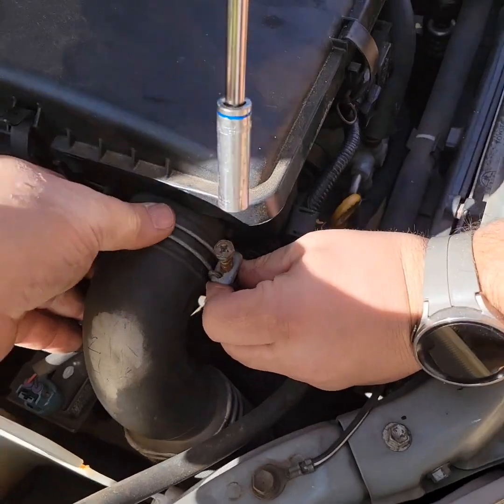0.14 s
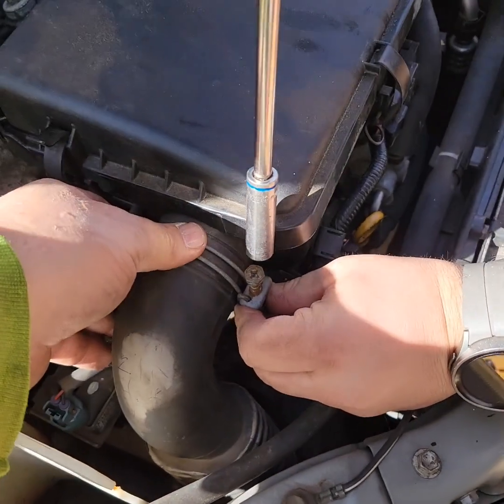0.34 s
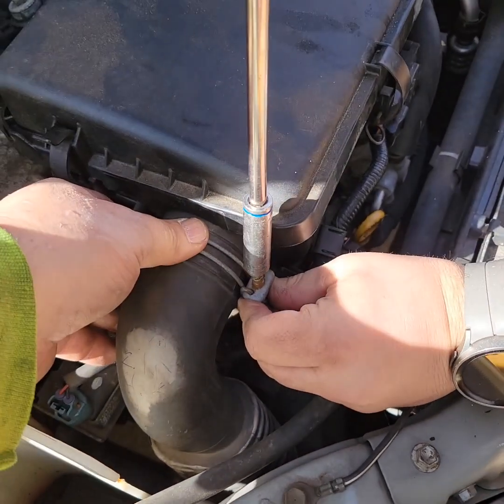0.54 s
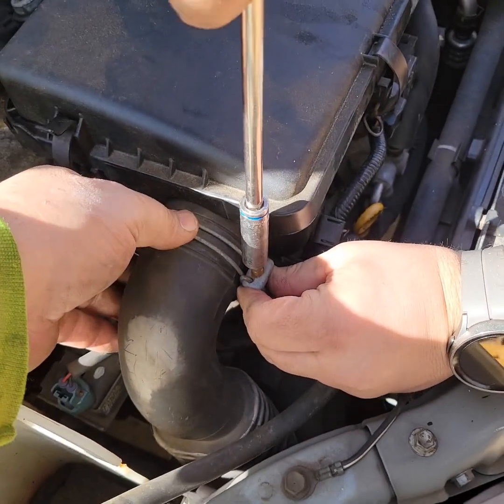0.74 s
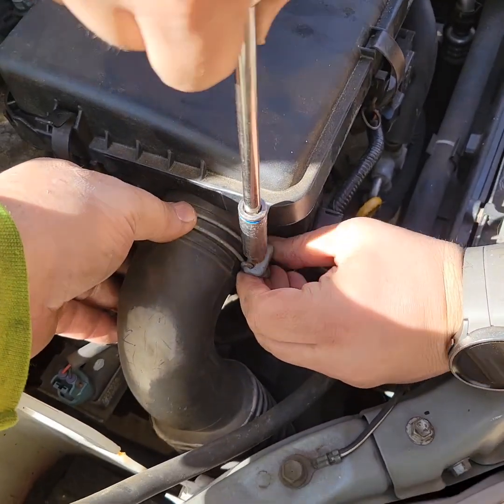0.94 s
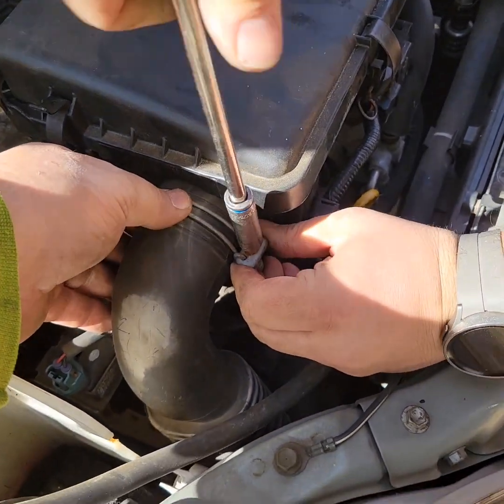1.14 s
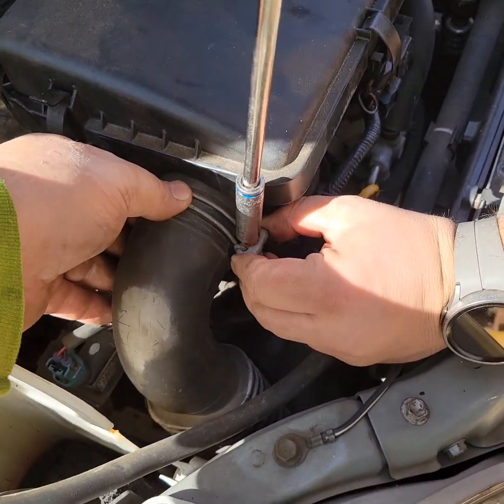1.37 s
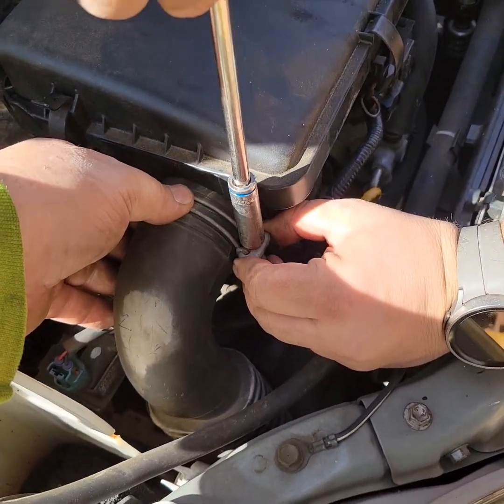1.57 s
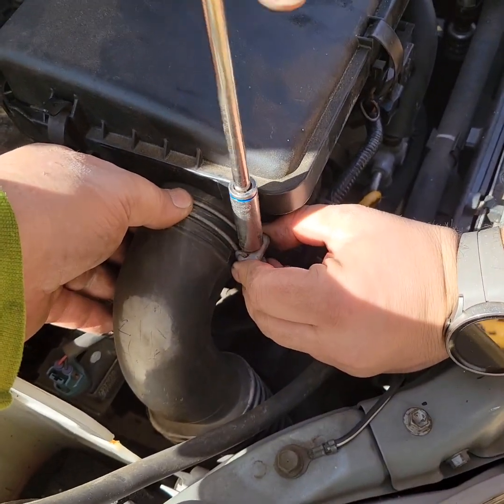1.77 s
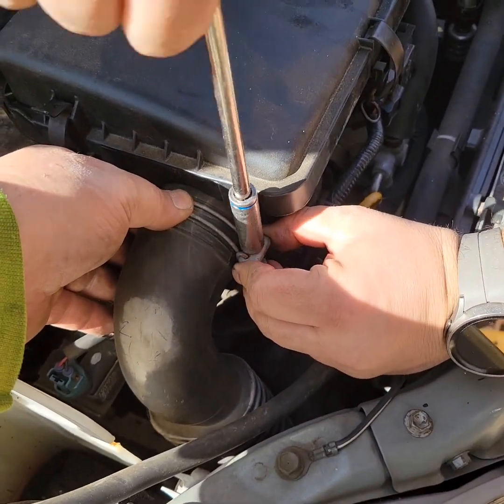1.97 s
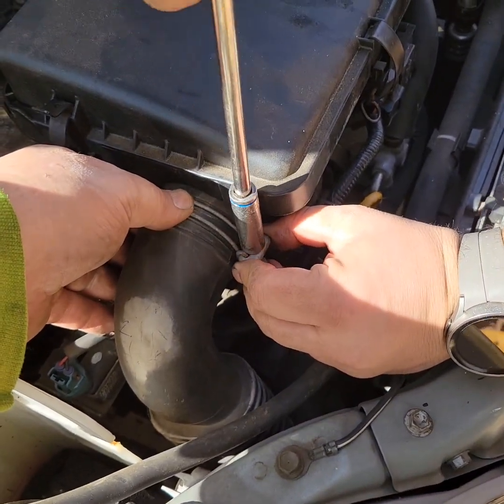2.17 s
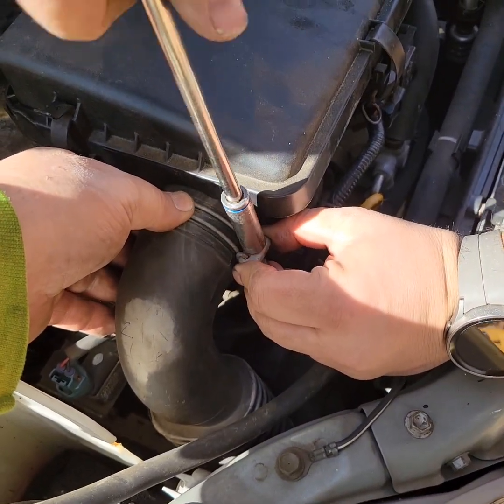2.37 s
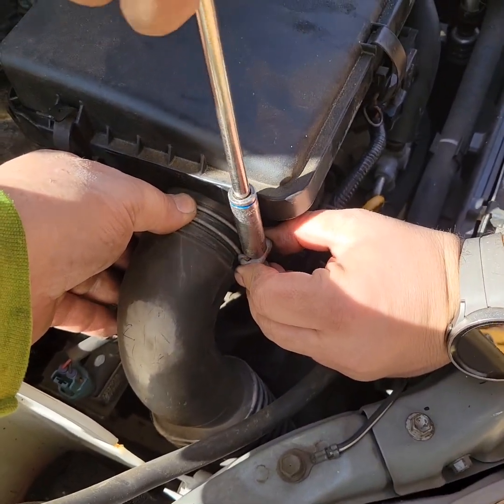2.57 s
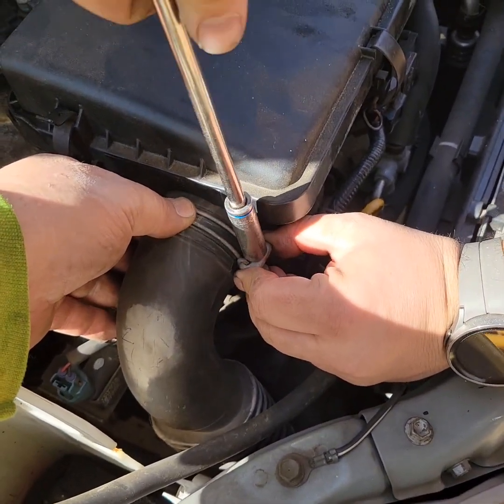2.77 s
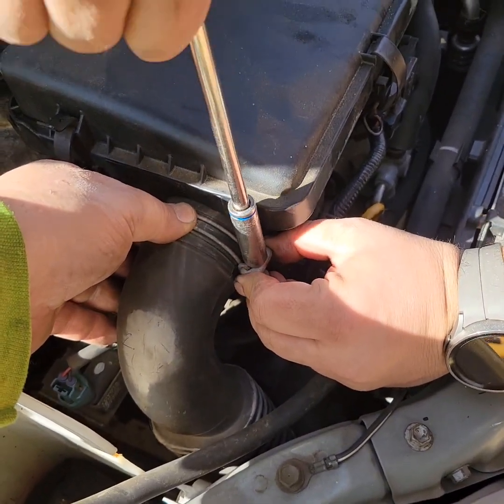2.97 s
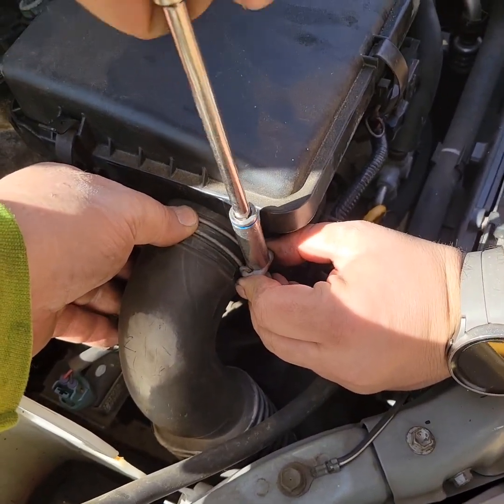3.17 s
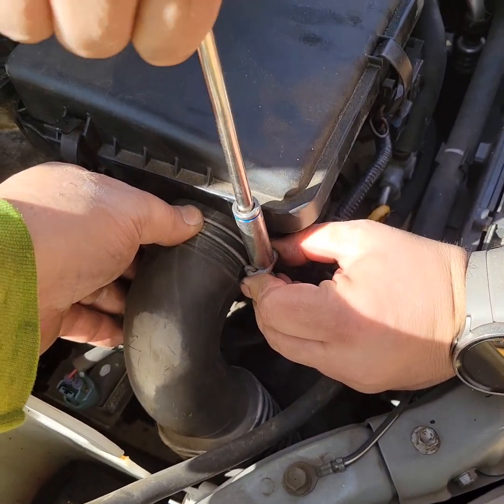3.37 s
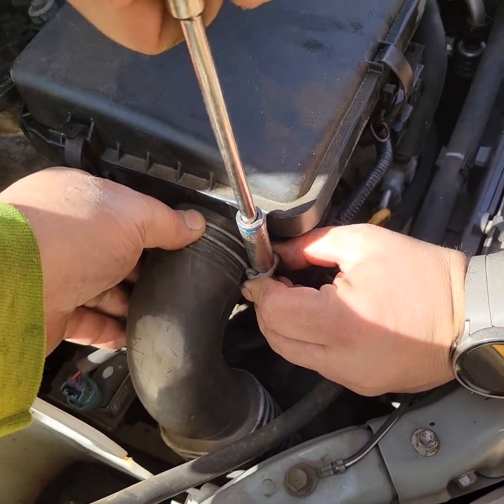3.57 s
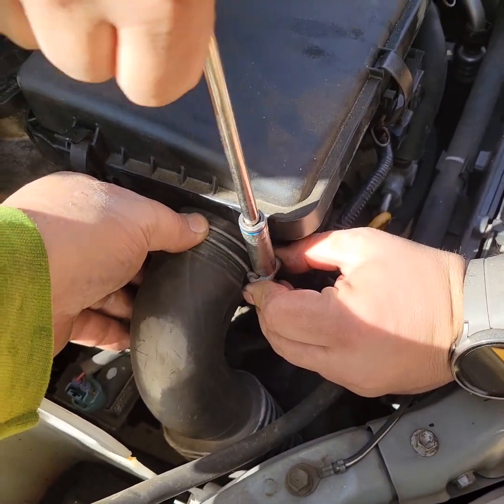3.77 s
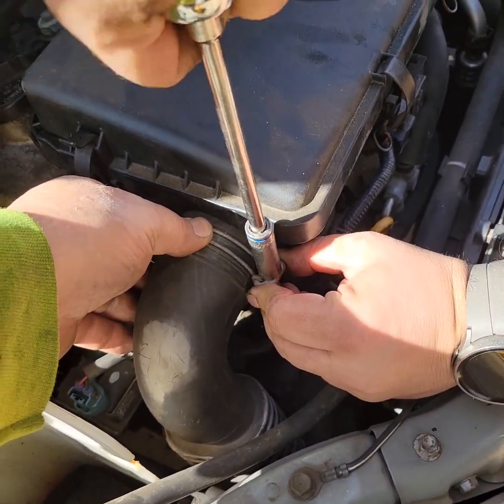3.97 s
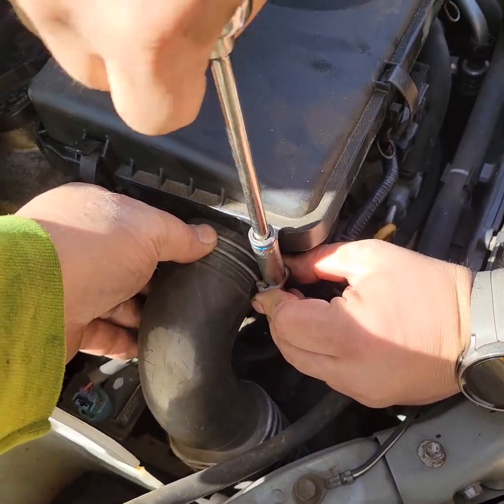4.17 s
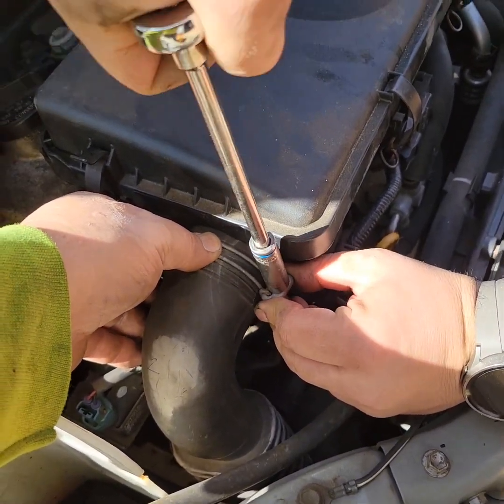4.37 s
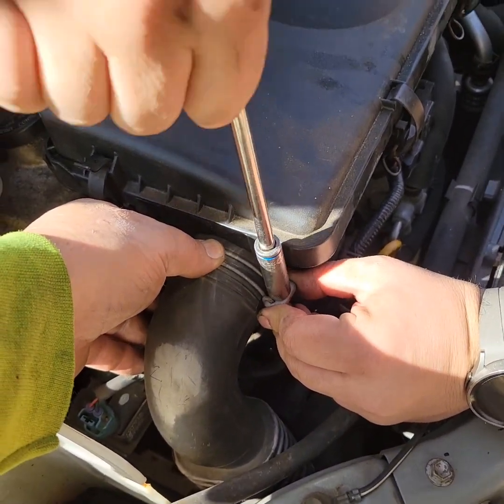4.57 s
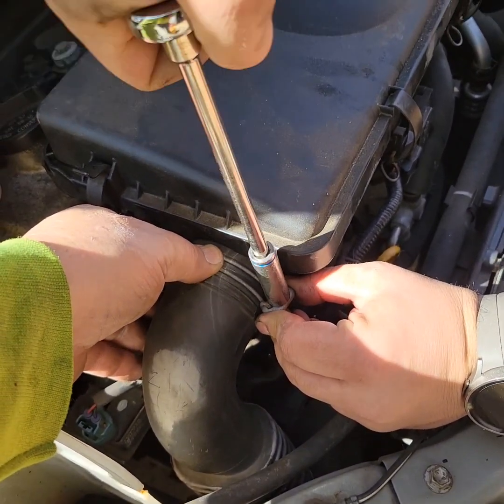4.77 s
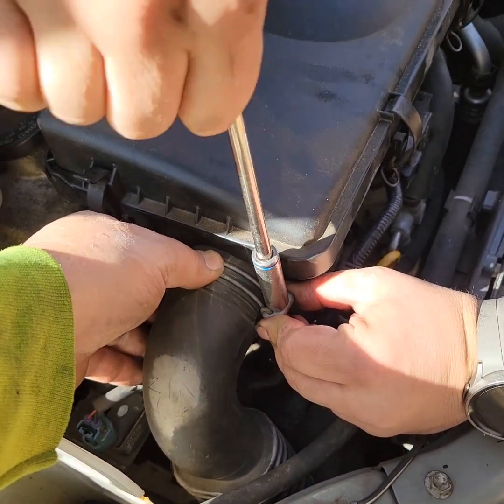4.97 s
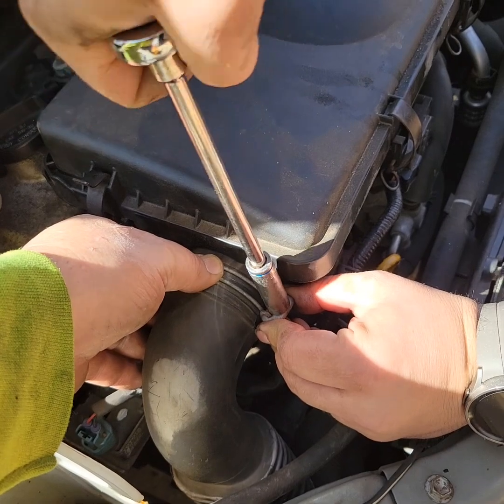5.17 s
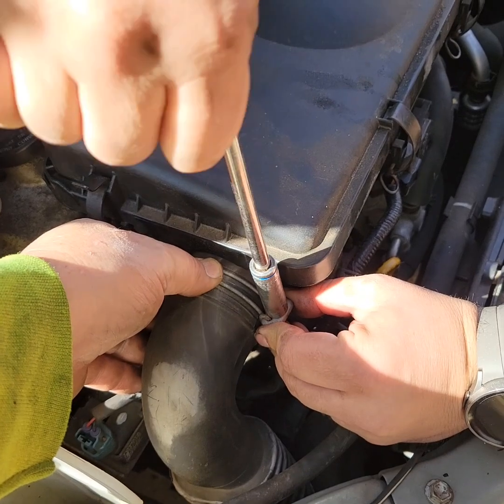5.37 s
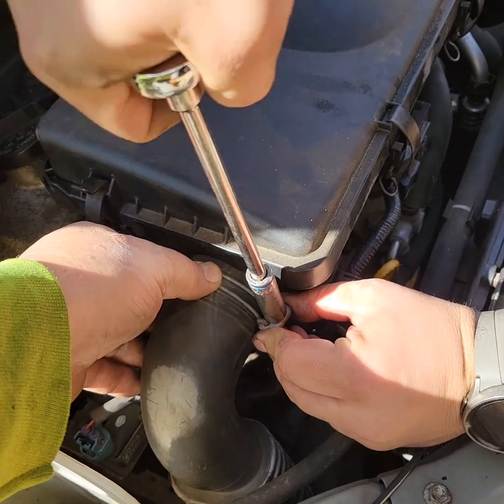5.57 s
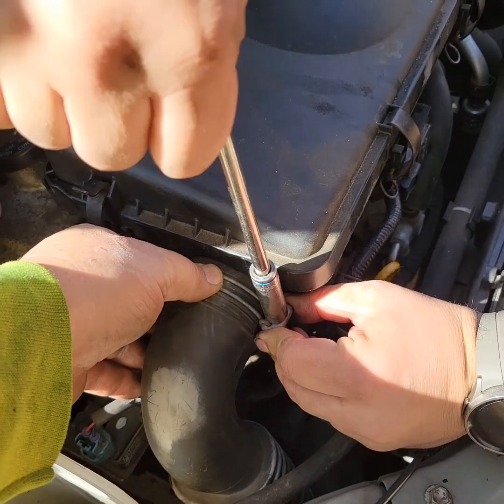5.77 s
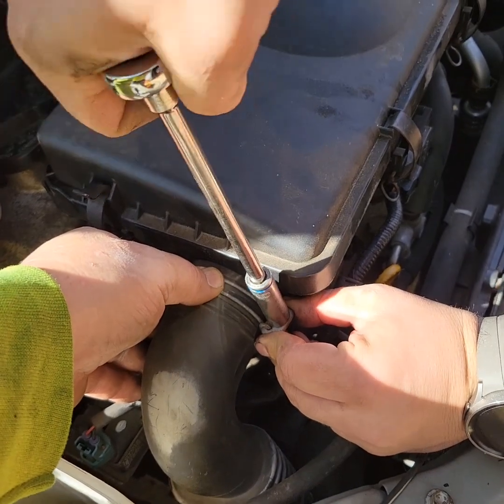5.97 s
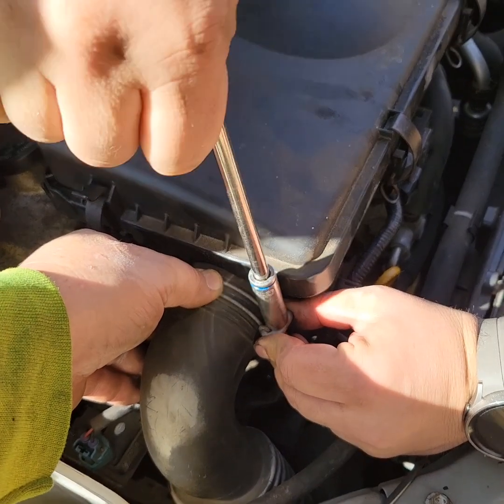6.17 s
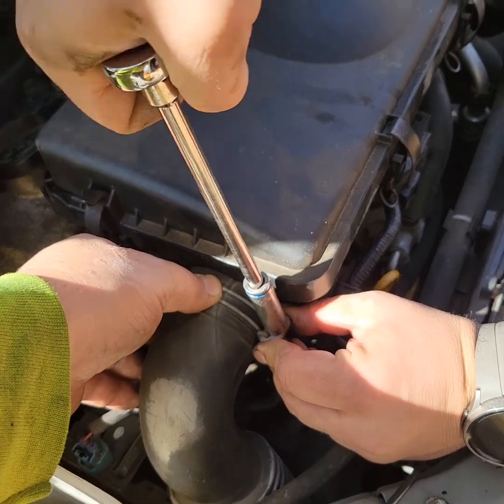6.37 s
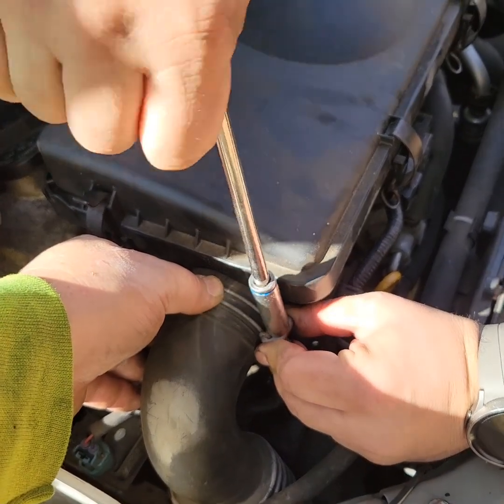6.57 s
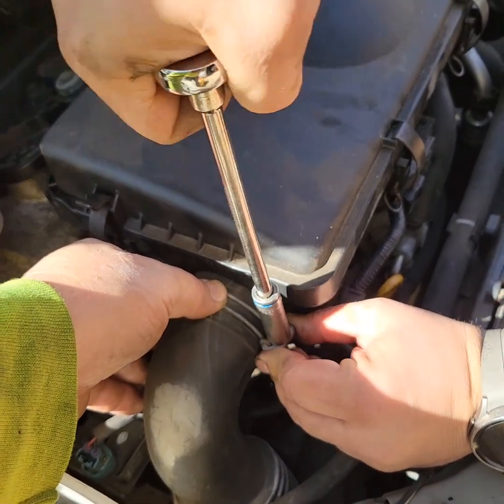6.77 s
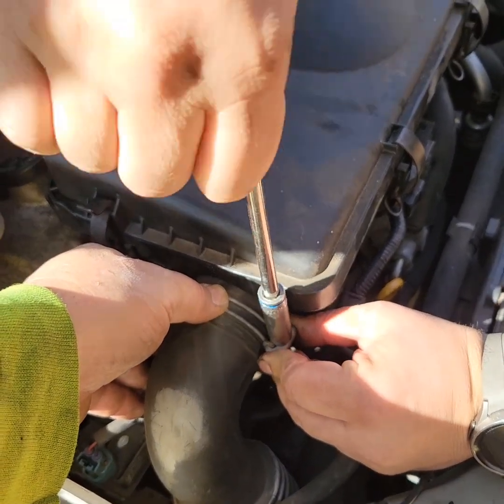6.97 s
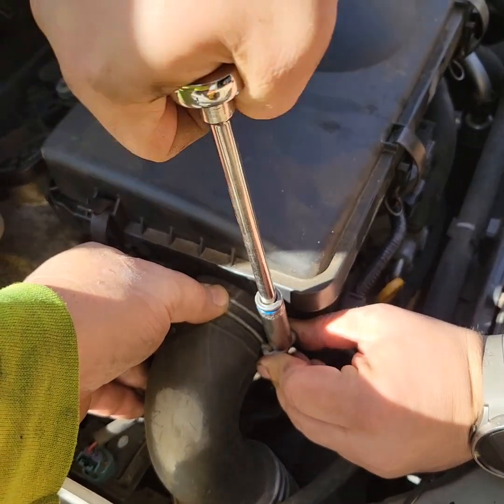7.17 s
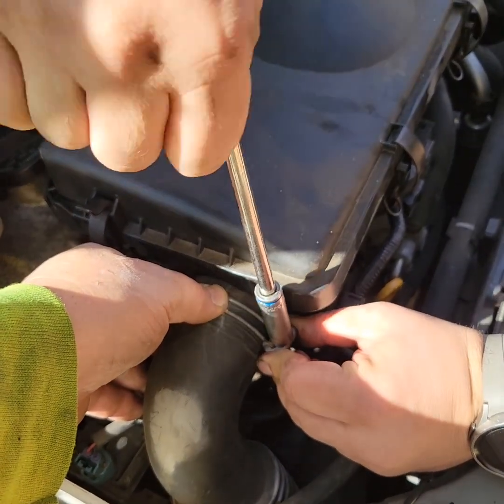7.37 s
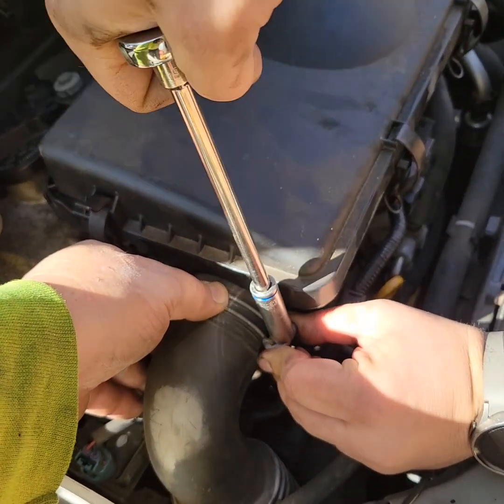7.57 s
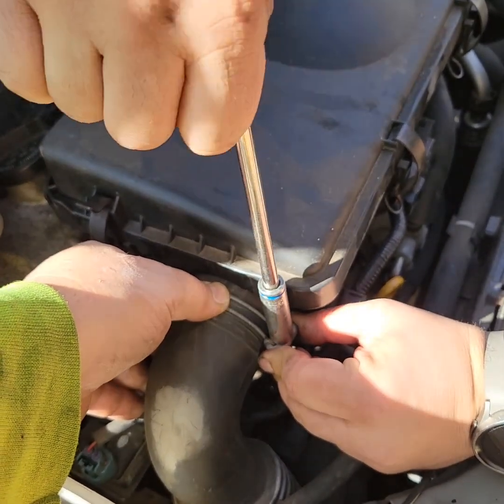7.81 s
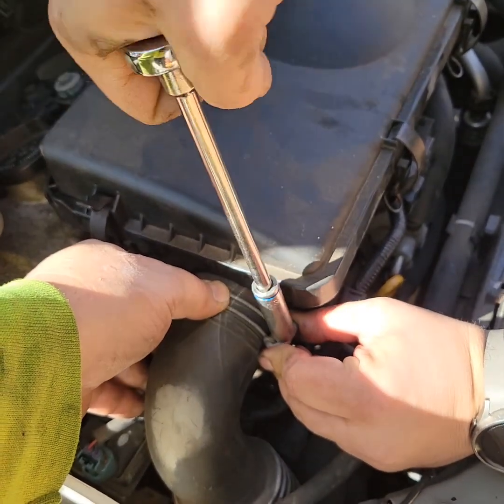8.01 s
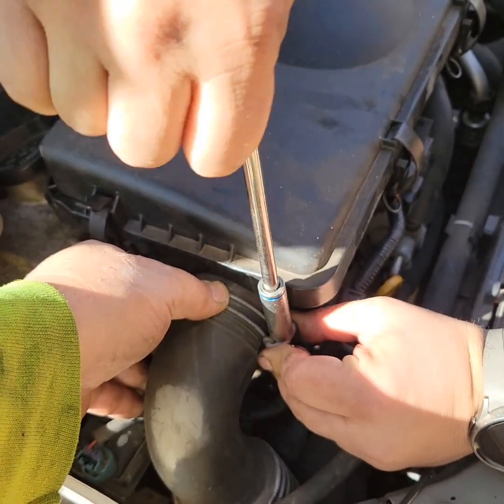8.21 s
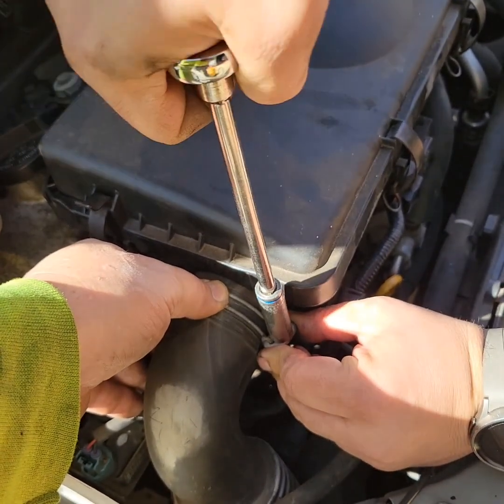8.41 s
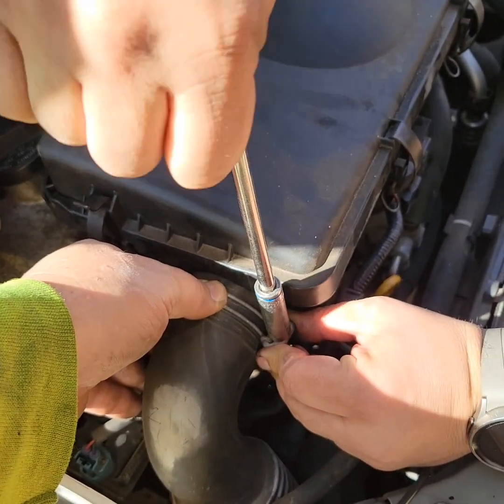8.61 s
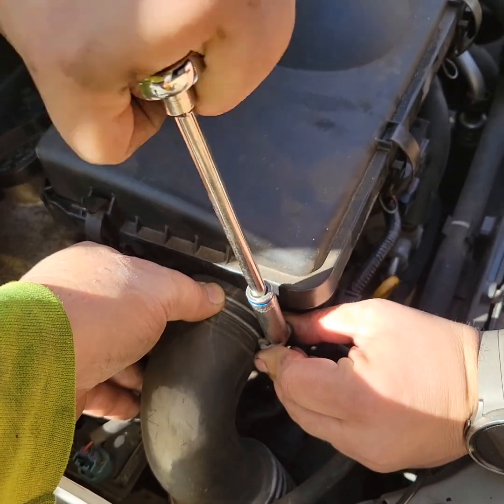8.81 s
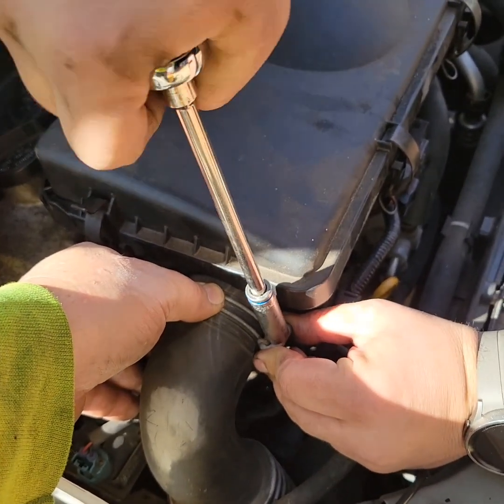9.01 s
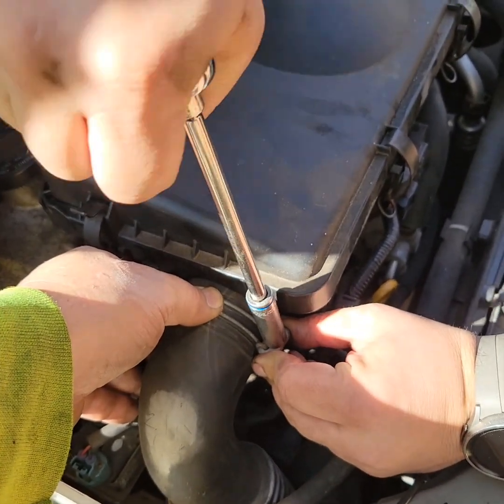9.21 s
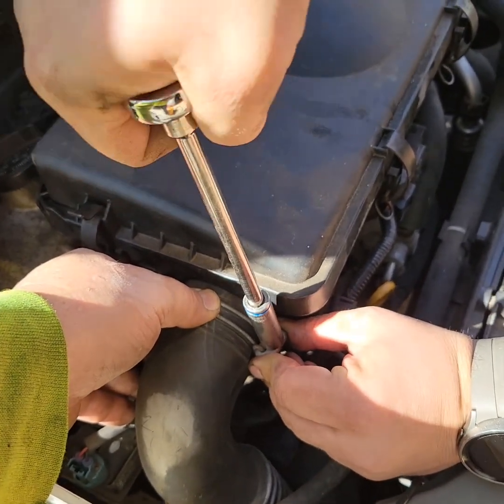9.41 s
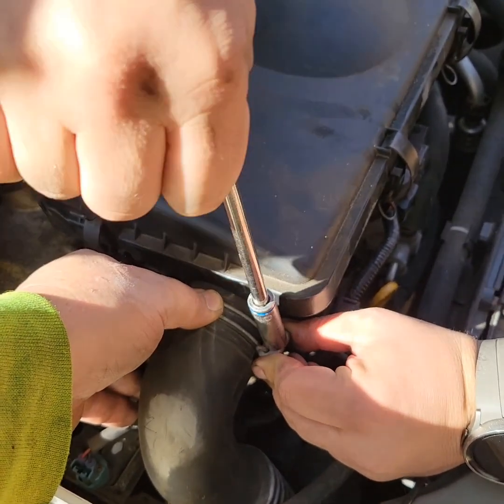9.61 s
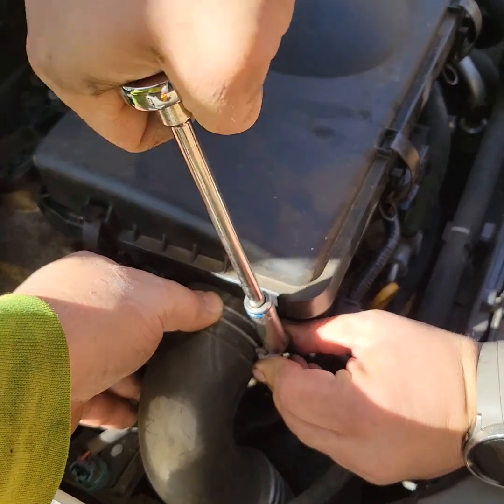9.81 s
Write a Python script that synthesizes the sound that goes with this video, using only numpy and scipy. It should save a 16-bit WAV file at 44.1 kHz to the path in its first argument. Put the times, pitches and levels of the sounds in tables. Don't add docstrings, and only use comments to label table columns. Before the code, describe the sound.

A ratchet zips in short bursts of fast metallic clicks, each followed by a knock and rubbery creak, with squeaks growing into sharp squeals.

```python
import sys
import numpy as np
from scipy import signal
from scipy.fft import rfft, irfft, next_fast_len
from scipy.io import wavfile
from scipy.ndimage import uniform_filter1d

SR = 44100
rng = np.random.default_rng(int(sys.argv[2]) if len(sys.argv) > 2 else 0)


def nominal_scale(level):
    x = np.asarray(level, float) / 20
    return 10 ** x


def to_wav(s):
    ch = np.atleast_2d(s).T
    pcm = np.round(np.clip(ch, -1, 1) * 32767)
    wavfile.write(sys.argv[1], SR, pcm.astype(np.int16))


N = 434385
TIME = np.arange(N) / SR
RATCHET_LAG, CLAMP_LAG = 14, -11
TOP_HZ = 15600


def unit(x):
    return x / np.sqrt(np.mean(x ** 2))


def colour(x, points):
    hz, db, *late = np.transpose(points)
    size = next_fast_len(N)
    grid = np.log(np.arange(size // 2 + 1) * SR / size + 1)
    turn = np.exp(-1j * np.interp(grid, np.log(hz), late[0])) if late else 1
    gain = nominal_scale(np.interp(grid, np.log(hz), db))
    return irfft(rfft(x, size) * gain * turn, size)[..., :N]


def ring(x, modes, patchy_db=0.):
    out = 0
    for hz, db, t60 in modes:
        radius = np.exp(-np.log(1000) / (t60 * SR))
        poles = [1, -2 * radius * np.cos(2 * np.pi * hz / SR), radius ** 2]
        feed_db = db + (patchy_db * walk(28) if patchy_db else 0)
        out = out + signal.lfilter([.5, 0, -.5], poles, x * nominal_scale(feed_db))
    return out


def fade(x, t60):
    return signal.lfilter([1], [1, -np.exp(-np.log(1000) / (t60 * SR))], x)


def smooth(x, size):
    return uniform_filter1d(x, size=size)


def spikes(s, db):
    x = np.zeros(N)
    x[(np.asarray(s) * SR).astype(int)] = nominal_scale(db)
    return x


def walk(rate):
    count = int(N / SR * rate) + 2
    return 1.22 * np.interp(TIME * rate, np.arange(count), rng.standard_normal(count))


def ports(noise_share=.5):
    common, left, right = rng.standard_normal((3, N))
    share = np.clip(noise_share, 0, 1)
    return np.sqrt(share) * common + np.sqrt(1 - share) * np.array([left, right])


def place(x, lag, pan_db):
    x = x * np.ones((2, 1))
    return np.array([nominal_scale(pan_db / 2) * x[0], nominal_scale(-pan_db / 2) * np.roll(x[1], lag)])


# (frequency [Hz], level [dB], lateness [rad])
CLAMP_SHADE = [(150, 0, 0), (700, -7, .8), (1350, 0, 1.8), (2900, -6, 1), (6000, -6, -1.5),
               (10000, 1, -2.5)]


def from_clamp(x):
    return np.array([colour(x, CLAMP_SHADE), x])


# (frequency [Hz], level [dB per Hz])
YARD = [(25, -35), (47, -10), (76, -2.5), (170, -18.5), (335, -24), (796, -29.5), (962, -37.5), (2990, -38),
        (6500, -45.5), (10000, -53), (16000, -48)]


def yard():
    mid, side = rng.standard_normal((2, N))
    side = colour(side, [(60, -12.0), (150, -22.0), (300, 2.0), (16000, 0.0)])
    level_db = -51 + 0.18 * walk(1.9)
    return nominal_scale(level_db) * unit(colour(np.array([mid + side, mid - side]), YARD))


# (start [s], length [s], creak level [dB], scrape level [dB])
FINGERS = [
    (0.09, 0.048, -58.5, -57),
    (0.145, 0.061, -61, -64.5),
    (0.407, 0.15, -63, -91),
    (0.923, 0.07, -58, -65.5),
]
# (creak level [dB], scrape level [dB])
PULLS = [(-58, -70), (-55.5, -68), (-54, -62), (-58, -63), (-50, -59.5), (-55.5, -65.5), (-47.5, -63),
         (-67, -69), (-49.5, -60.5), (-55.5, -61), (-50.5, -59.5), (-51, -58.5), (-57, -59), (-48.5, -61),
         (-54, -62), (-49.5, -60.5), (-40, -55.5), (-52, -58), (-59.5, -55.5), (-36.5, -61), (-38.5, -56)]
# (frequency [Hz], level [dB], t60 [s])
HOSE = [(350, -7, 0.049), (510, -11, 0.075), (663, -0.5, 0.013), (781, 0, 0.028), (1114, 0.5, 0.01),
        (1640, -1.5, 0.01)]
# (frequency [Hz], level [dB per Hz])
RUB = [(300, -4.5), (1400, -10.5), (2000, -10), (3200, -9), (5400, -13.5), (8000, -22.5), (9500, -41.5),
       (16000, -44.5)]


def creak():
    pull_share = 0.46
    next_starts = [swing[0] for swing in SWINGS[1:]] + [N / SR]
    pulls = []
    for (start, length, *_), then, levels in zip(SWINGS, next_starts, PULLS):
        pulls.append((start + length + 0.016, pull_share * (then - start - length), *levels))
    load, drag = np.zeros((2, N))
    for s, length, creak_db, scrape_db in pulls + FINGERS:
        span = slice(int(s * SR), min(int((s + length + 0.049) * SR), N))
        effort = signal.windows.tukey(span.stop - span.start, .7)
        load[span] += nominal_scale(creak_db) * effort
        drag[span] += nominal_scale(scrape_db) * effort
    uneven_db = 2.0 * walk(60) + 6.5 * np.clip(walk(420), -3, 1.8)
    slips = load * nominal_scale(uneven_db) * ports(0.93)
    grit = nominal_scale(2 * walk(14) + 1.5 * walk(250))
    scrape = drag * grit * unit(colour(ports(0.052), RUB))
    return place(nominal_scale(-27.0) * ring(slips, HOSE) + nominal_scale(7.0) * scrape, CLAMP_LAG, -2.9)


# (start [s], length [s], start pitch [Hz], end pitch [Hz],
# level [dB])
WHISTLES = [
    (2.369, .03, 9000, 9840, -60),
    (3.871, 0.028, 10000, 9650, -49),
    (4.258, 0.018, 9600, 9800, -58),
    (7.089, 0.032, 10150, 10370, -51),
    (3.88, 0.023, 1580, 1780, -49),
    (5.19, 0.025, 1560, 1600, -62),
    (6.76, 0.024, 1480, 1500, -59),
    (7.127, 0.043, 1500, 1420, -58),
    (9.305, .026, 870, 770, -46),
    (9.694, .03, 10250, 10000, -53),
]
# (time [s], pitch [Hz], level [dB])
THREAD = [
    [(3.47, 9591, -100), (3.49, 9662, -53), (3.506, 9389, -52), (3.518, 9525, -55), (3.53, 9553, -74)],
    [(5.135, 9930, -82), (5.145, 10136, -56), (5.161, 10351, -51), (5.173, 9951, -48), (5.19, 9783, -72)],
    [(5.89, 9381, -89), (5.904, 9407, -60), (5.922, 9770, -47), (5.948, 9719, -57), (5.96, 9819, -73)],
    [(6.34, 10017, -80), (6.358, 10013, -59), (6.368, 10139, -49), (6.38, 10266, -47), (6.39, 10274, -57)],
    [(6.71, 9225, -85), (6.722, 10217, -59), (6.738, 10370, -48.5), (6.766, 10066, -44), (6.78, 10185, -68)],
    [(7.495, 10183, -75), (7.503, 10047, -66), (7.557, 9529, -45), (7.585, 9254, -51), (7.6, 9620, -39)],
    [(7.99, 10326, -80), (8.002, 10119, -50), (8.01, 10298, -51), (8.032, 9695, -44.5), (8.05, 9787, -73)],
    [(8.36, 9648, -90), (8.374, 9736, -47), (8.392, 10046, -45), (8.408, 9756, -38), (8.43, 9629, -57)],
    [(8.81, 9525, -82), (8.83, 9704, -51), (8.844, 9368, -45), (8.852, 9576, -46), (8.87, 9367, -46)],
]


def whistles():
    flutter, tremble = nominal_scale(3.5 * walk(200)), .012 * walk(400)
    hz, gain = np.zeros((2, N))
    for s, length, start_hz, end_hz, db in WHISTLES:
        span = slice(int(s * SR), int((s + length) * SR))
        count = span.stop - span.start
        hz[span] = np.linspace(start_hz, end_hz, count)
        gain[span] = nominal_scale(db + 17.5) * signal.windows.tukey(count, .6)
    for table in THREAD:
        at, pitch_hz, db = np.transpose(table)
        span = slice(int(at[0] * SR), int(at[-1] * SR))
        hz[span] = np.interp(TIME[span], at, pitch_hz)
        swell = nominal_scale(np.interp(TIME[span], at, db) + 17.5)
        gain[span] = swell * signal.windows.tukey(span.stop - span.start, .15)
    phase = 2 * np.pi * np.cumsum(hz * (1 + tremble)) / SR
    return from_clamp(gain * flutter * np.sin(phase))


# (time [s], slip rate [Hz], level [dB])
SQUEAKS = [
    (-65, [(5.538, 790, -51), (5.553, 784, -34), (5.558, 1114, -37), (5.568, 1197, -28.5), (5.58, 1045, -46), (5.59, 1104, -28.5), (5.601, 903, -24.5), (5.615, 920, -70)]),
    (-44.5, [(7.562, 2810, -37), (7.567, 3035, -19), (7.573, 3120, -28), (7.578, 2840, -11.5), (7.5815, 2830, -25), (7.586, 2850, -15), (7.591, 2924, -18.5), (7.599, 2850, -45), (7.7, 2880, -76)]),
    (-51, [(8.412, 1450, -44), (8.42, 1500, -35), (8.427, 1550, -58), (8.433, 1644, -26), (8.441, 1700, -48), (8.45, 1710, -67)]),
    (-69, [(8.84, 1226, -47), (8.85, 1200, -30.5), (8.862, 1250, -41), (8.868, 1240, -45), (8.875, 1240, -33), (8.886, 1280, -25)]),
]
# (time [s], slip rate [Hz], level [dB], half-rate partials [dB], brightness [dB per octave])
SQUEALS = [
    (-43, [(8.81, 2485, -40, -5, 6), (8.814, 2770, -23.5, -1, 5), (8.8165, 2790, -29, -8, 0), (8.8185, 2850, -12, -28, -9), (8.8215, 3130, -26, -30, -3), (8.826, 3130, -29, -30, -5), (8.84, 3000, -46, -28, 0)]),
    (-32, [(8.865, 3050, -22, -33, 2), (8.867, 3016, -17, -32, 3.5), (8.884, 3080, -16, -24, -7), (8.887, 2694, -21, 7, 3), (8.9, 2860, -20, 0.5, -9), (8.91, 2880, -45, 3, 0), (8.935, 2820, -57, 3, 0)]),
    (-36.5, [(9.25, 1313, -46, -39, 4), (9.263, 1635, -23, -34, 3), (9.271, 1422, -27, -35, 5), (9.28, 1412, -14.5, -29, 1.5), (9.299, 1176, -19, -18, -1.5), (9.316, 1087, -21.5, 0.5, -5), (9.334, 1294, -19.5, -4, -4.5), (9.352, 1317, -22.5, -6, -1), (9.385, 1300, -51.5, 1, 7)]),
    (-39.5, [(9.7165, 2994, -20, -58, -17), (9.7195, 3150, -10.5, -68, -15), (9.738, 3268, -8.5, -60, -8), (9.749, 3170, -13, -55, -2), (9.762, 3150, -14, -48, -2), (9.769, 3098, -12, -5, 3), (9.785, 3010, -22.5, 9, 1.5), (9.797, 3120, -46, -2, 12), (9.847, 3100, -63, 1, 13)]),
]
# (frequency [Hz], level [dB])
BAND = [(520, -2), (1250, 2.5), (2000, -8.5), (3000, 6), (4400, -3), (5900, 3.5), (8000, -5.5),
        (15000, -29.5)]


def squeaks():
    slope_db, wobble = -3.0, 0.012
    soft_tilt = 0.64
    lock = 2.7
    doubled_rasp_db, most_rasp_db = 7, -10
    out, tremble, rasp = np.zeros(N), wobble * walk(400), rng.standard_normal(N)
    rasp = colour(rasp, [(300, -45), (900, -11.5), (3000, -7.5), (7500, -6.0), (9000, -38), (16000, -23)])
    rasp = unit(rasp)
    flicker = walk(60)
    band_hz, band_db = np.transpose(BAND)
    order = np.arange(1, 21)[:, None] / 2
    for level_db, table in SQUEAKS + SQUEALS:
        at, rates, *columns = np.transpose(table)
        span = slice(int((at[0] - .0025) * SR), min(int((at[-1] + 0.0026) * SR), N))
        curves = [np.interp(TIME[span], at, c) for c in columns]
        db, half_db, bright_db = (curves + [-80, 0])[:3]
        point = np.arange(len(at))
        steps = np.interp(TIME[span], at, point)
        locked = steps // 1 + np.clip((steps % 1 - .5) * lock + .5, 0, 1)
        hz = np.interp(locked, point, rates)
        rasp_db = level_db - db + doubled_rasp_db * np.minimum(nominal_scale(half_db), 1)
        rasp_db = np.minimum(rasp_db, most_rasp_db)
        phase = 2 * np.pi * np.cumsum(hz * (1 + tremble[span] * nominal_scale(rasp_db / 2 + 9.0))) / SR
        tilt_db = slope_db + bright_db + soft_tilt * np.clip(db + 17.0, -40, 0)
        moment = np.arange(span.start, span.stop) * order + 999 * order
        broken = flicker[moment.astype(int) % N]
        gain_db = np.interp(np.log(order * hz), np.log(band_hz), band_db) + half_db * (order % 1 > 0)
        gain_db = gain_db + tilt_db * np.log2(np.maximum(order, 1)) + 3.5 * broken
        gains = nominal_scale(gain_db) * (order * hz < TOP_HZ)
        partials = gains * np.sin(order * phase + order ** 2 + broken * (order > 1))
        tone = np.sum(partials, axis=0) / np.sqrt(np.sum(gains ** 2, axis=0) / 2)
        count = np.arange(len(hz))
        edge = np.minimum(1, np.minimum(count, count[::-1]) / (0.0023 * SR))
        edge = edge * nominal_scale(1.2 * tremble[span] / wobble)
        out[span] += edge * nominal_scale(db) * (tone + nominal_scale(rasp_db + 2.5) * rasp[span])
    return nominal_scale(3.5) * from_clamp(out)


# (frequency [Hz], level [dB], t60 [s])
SOCKET = (.381, -32, [(560, 14.4, 0.008), (1008, 9.6, 0.057), (1250, 11, 0.017), (1740, 12.4, 0.011),
          (2250, 8, 0.012), (3080, 3.2, 0.006)])
# (time [s], thud level [dB], tick above thud [dB])
SEATING = [
    (0.361, -45.5, 0),
    (0.562, -37, 3),
    (0.583, -50, 2),
    (0.589, -40, 4.5),
    (0.615, -33.5, -8),
    (0.812, -52.5, 26),
    (0.853, -52.5, 27),
    (0.894, -77.5, 28.5),
]
# (time [s], thud level [dB], tick above thud [dB])
TAKE_UP = [(1.65, -34.5, 5), (2.012, -32, -1), (2.362, -24, -9.5), (2.719, -22.5, -9), (3.084, -34, 11),
           (3.439, -35, 0.5), (3.819, -28, -21), (4.23, -33, -3), (4.681, -31.5, 1.5), (5.092, -27, 3),
           (5.489, -23, -12), (5.873, -27, -10), (6.296, -26.5, -2), (6.698, -29, -4), (7.078, -30, 2.5),
           (7.488, -37.5, 5), (7.939, -25.5, -35), (8.35, -27.5, 4), (8.772, -19.5, -12),
           (9.24, -19.5, -19), (9.676, -22, 1)]
# (time
# [s], thud level [dB], tick above thud [dB])
REBOUNDS = [(1.654, -38, -18), (2.017, -48, 16), (2.284, -25.5, -8), (2.373, -41.5, 7.5), (2.731, -35, 3.5),
            (3.095, -33.5, 2), (3.45, -37, -1), (3.827, -33, -14), (4.236, -45, 1), (4.242, -32.5, 3.5),
            (4.687, -33, -3), (5.103, -30, -6), (5.108, -53, 17.5), (5.885, -31.5, -3), (5.893, -31.5, -17),
            (6.302, -32.5, -11), (6.707, -34.5, -2), (7.093, -33, 7), (7.494, -36, -17),
            (7.947, -30.5, -1.5), (7.958, -31, -23), (8.36, -29, -3), (8.784, -31.5, -14),
            (9.246, -35, -20)]
# (time [s], thud level [dB], tick above thud [dB])
ROCKING = [(1.309, -55, 12), (1.755, -45.5, 2), (2.174, -48.5, 9.5), (2.888, -37.5, 1.5), (2.908, -55, 14),
           (3.241, -39.5, 7), (3.799, -35.5, 10), (3.813, -35.5, 9.5), (3.88, -28.5, 4), (4.012, -37, 0),
           (4.05, -47, 19), (4.424, -50, 10), (5.06, -45, 7), (5.175, -42.5, 0), (5.307, -59, 2),
           (5.506, -28.5, 2.5), (5.714, -45, 13), (7.706, -51, 7), (6.102, -36.5, -1), (6.345, -53, 13),
           (6.359, -46.5, 21), (6.871, -29.5, -5.5), (7.284, -36, 1), (7.476, -30, -22), (8.335, -28, -1),
           (9.207, -42, 5)]
# (frequency [Hz], level [dB], t60 [s])
HOSE_KNOCK = [(163.8, -14.5, 0.13), (336.3, -10.5, 0.15), (505, -13, 0.032), (822, 2, 0.059), (1550, -13, .02),
              (1800, -6.5, 0.015), (2920, -3, .01)]
# (frequency [Hz], level [dB], t60 [s])
TICK = [(1500, -2.5, .02), (2390, 1, 0.02), (3150, -3.5, .015), (4070, -7, .014), (5200, -7.5, .012)]


def knocks():
    s, thud_db, tick_db = np.transpose(SEATING + TAKE_UP + REBOUNDS + ROCKING)
    reversals = spikes([swing[0] - .012 for swing in SWINGS], np.array(STROKES)[:, -1])
    catch = smooth(reversals, 80)
    reversals = smooth(reversals, 330)
    noise = ports(0.33)
    dull = smooth(smooth(noise, 12), 12)
    direct = spikes(*np.transpose(SEATING + TAKE_UP + ROCKING)[:2])
    bounce = smooth(spikes(*np.transpose(REBOUNDS)[:2]), 28)
    blow = direct + 1.65 * bounce
    hose_thud = nominal_scale(-7.0) * ring(smooth(smooth(blow, 9), 9), HOSE_KNOCK, patchy_db=2.5)
    push = fade(fade(spikes(s, thud_db) + reversals, 0.0032), 0.065)
    thud = nominal_scale(-53.0) * ring(push * dull, HOSE[1:])
    ticks = spikes(s, thud_db + tick_db - 8.5) + nominal_scale(-8.5) * catch
    ticks = ticks + nominal_scale(-16.5) * np.roll(reversals, -int(0.0098 * SR))
    sharp = smooth(fade(ticks, 0.048), 60)
    steel = [(800, -14.5), (2500, 3.0), (5500, 2.0), (8000, -5.0), (10000, -17.0)]  # (Hz, dB)
    tick = nominal_scale(-2.0) * sharp * unit(colour(noise, steel))
    contact = fade(spikes(s, thud_db + tick_db - 7.0), 0.0074)
    tick = tick + nominal_scale(-22.5) * ring(contact * noise, TICK, patchy_db=8.5)
    glint = fade(spikes(s, thud_db + 2.62 * tick_db - 41.5), 0.012)
    glint = glint * unit(colour(noise, [(6000, -19.0), (9000, -11.0), (16000, -10.0)]))
    s, db, modes = SOCKET
    landing = fade(spikes([s, s + 0.017], [db, db - 11.5]), 0.033)
    socket = nominal_scale(-20.5) * ring(landing * smooth(smooth(noise, 7), 7), modes)
    return from_clamp(hose_thud) + place(thud + tick + glint + socket, RATCHET_LAG, -3.5)


def teeth_passed(length, teeth, fastest, last_speed, first_speed, held):
    share = np.linspace(0, 1, 200)
    speed = np.interp(share, [0, held * fastest, fastest, 1], [first_speed, first_speed, 1, last_speed])
    turned = np.cumsum(speed)
    return np.interp(np.linspace(turned[0], turned[-1], int(teeth) + 1), turned, share)


# (first click [s], length [s], teeth passed [count],
# fastest moment [share of length], last speed [share of top speed])
SWINGS = [(1.3787, 0.184, 24, 0.62, 0.64), (1.8378, 0.1194, 21, 0.5, 0.1), (2.206, 0.1118, 19, 0.54, 0.34),
          (2.5575, 0.1104, 19, 0.5, 0.22), (2.9246, 0.121, 22, 0.54, 0.34), (3.2701, 0.1379, 21, 0.38, 0.1),
          (3.6553, 0.1163, 19, 0.3, 0.34), (4.0739, 0.0452, 5, 0.22, 0.34), (4.4698, 0.1694, 23, 0.1, 0.46),
          (4.9166, 0.1221, 20, 0.3, 0.16), (5.3285, 0.1272, 21, 0.18, 0.34),
          (5.7302, 0.0809, 13, 0.26, 0.28), (6.1256, 0.1094, 17, 0.42, 0.22),
          (6.4983, 0.1597, 19, 0.26, 0.22), (6.9308, 0.0858, 16, 0.38, 0.34),
          (7.3375, 0.0768, 11, 0.16, 0.24), (7.7368, 0.1359, 21, 0.26, 0.22),
          (8.1556, 0.1452, 24, 0.38, 0.28), (8.5969, 0.1123, 16, 0.14, 0.16),
          (9.0467, 0.1002, 18, 0.5, 0.34), (9.5074, 0.1209, 18, 0.18, 0.1)]
SET_OFF = [(1.0, 0.85), (0.65, 0), (0.79, 0), (0.58, 0), (0.44, 0), (0.58, 0), (0.72, 0), (0.93, 0),
           (1.0, 0.85), (0.65, 0), (0.86, 0.5), (0.93, 0.5), (1.0, 0.85), (0.65, 0), (0.86, 0), (0.6, 0),
           (0.79, 0.5), (0.51, 0), (1.0, 0.85), (1.0, 0.85), (0.65, 0)]
# (first click [dB], last click [dB], head ring [dB], reversal thud [dB])
STROKES = [(-17.5, -29, 2, -33), (-18, -26, -6, -26), (-23, -26.5, 7.5, -38.5), (-18.5, -26, -5.5, -33.5),
           (-23, -26, -4, -55), (-20.5, -25, -15, -34), (-20, -24, 7, -27), (-24, -27, 2, -31.5),
           (-27.5, -25, 19, -33), (-22, -26.5, 16, -29), (-23, -24, 15, -28.5), (-21.5, -31, -21, -23.5),
           (-23.5, -24, 7, -30), (-25, -25.5, 13.5, -34), (-21, -25.5, 10.5, -23),
           (-22.5, -28.5, -6, -25.5), (-25.5, -25, 14.5, -30.5), (-23, -27, 12.5, -34.5),
           (-21, -26, 10, -22), (-24, -29, 7, -22.5), (-22, -26, -2, -23.5)]
# (hose hum [dB], low crack [dB], top crack [dB])
GRIPS = [(-4.5, -10, 1), (-2.5, 2, -4.5), (-1.5, 2, 0), (-2, 0.5, -1.5), (-2, 7.5, 0.5), (-2, 3, 4),
         (-1, 5.5, 1), (-7.5, -4, 0), (-5, -1.5, -2), (1, -8, 2.5), (-1, 2.5, -2), (1, -8, 1), (1, -4, 0),
         (1.5, -10, 4), (1, 4, 0.5), (3, -5, 5), (1.5, -2, 4), (3.5, -2, 2), (6, -9, 0), (3.5, -11, 2.5),
         (5, 3.5, 2)]
# (frequency [Hz], level [dB per Hz])
PAWL = [(1200, -22), (2300, -21.5), (3100, -12), (5000, 1), (5450, 4), (5940, -5), (7200, -0.5),
        (9120, -17), (13600, -11.5), (15300, -4)]
# (low edge [Hz], high edge [Hz],
# left minus right [dB], drift [dB per s])
FACES = [(1200, 2300, 1.5, 0.5), (2770, 4786, -2, -0.08), (4260, 6374, -3.5, 0.39),
         (5887, 8530, -2.5, 0.16), (8180, 13360, 4.5, -0.08), (12160, 13000, -0.5, 0.0)]
# (frequency [Hz], level [dB], t60 [s])
HEAD = [(3700, -13, .012), (5370, -3, .025), (5520, -6, .02), (6450, -7, .012), (7000, -11, .01),
        (7900, -13, .01)]
# (frequency [Hz], level [dB], t60 [s])
SPRING = [(2900, -12, .015), (3350, -10, .015), (4060, -9, .015), (5900, -7, .012), (7890, -7, .012),
          (10200, -11, .006), (12700, -11, .006), (14600, -1, .006), (15000, 1, .008), (15400, 1, .006)]


def ratchet():
    s, db, ring_db, grips = [], [], [], []
    for swing, stroke, set_off, grip in zip(SWINGS, STROKES, SET_OFF, GRIPS):
        start, length, teeth, *speed = swing
        first_db, last_db, head_db, _ = stroke
        share = teeth_passed(length, teeth, *speed, *set_off)
        tooth, inner = np.arange(len(share)), (share > 0) & (share < 1)
        fall = np.interp(share, [0, 0.033, 0.39, 1], [0, 0, 0.98, 1])
        chance = rng.standard_normal((40, 2))[:len(tooth)]
        s += list(start + length * share + 0.0003 * chance[:, 0] * inner)
        db += list(first_db + (last_db - first_db) * fall + 0.5 * chance[:, 1] * inner)
        grips += [grip] * len(tooth)
        ring_db += list(head_db + 7.0 - 31.0 * tooth / teeth)
    hum_db, low_db, top_db = np.transpose(grips)
    db, noise, crack = np.array(db), unit(colour(ports(0.088), PAWL)), 0
    sets = []
    for k in range(2):
        peaks_db = 5 * np.clip(rng.standard_normal(100), -2.5, 1.2)
        modes = np.c_[np.arange(1000, 17000, 160), peaks_db]
        sets.append(colour(np.roll(noise, k * SR, axis=1), modes))
    grip = 1.6 * walk(14)
    noise = unit(np.cos(grip) * sets[0] + np.sin(grip) * sets[1])
    for low_hz, high_hz, pan_db, drift_db in FACES:
        hit_db = db + low_db * (low_hz < 2000) + top_db * (low_hz > 11000)
        hits = spikes(s, hit_db + 1.6 * rng.standard_normal(len(s)))
        rattle = nominal_scale(-45.5) * fade(hits, 0.055)
        landing = smooth(fade(fade(hits + rattle, 0.0035), 0.0069), 85)
        push = nominal_scale(-22.5 + 1.0 * walk(20)) * landing * 2
        band = signal.sosfilt(signal.butter(3, [low_hz, high_hz], "band", fs=SR, output="sos"), noise)
        drift = nominal_scale(drift_db * (TIME - TIME.mean()))
        crack = crack + place(push * band * drift, RATCHET_LAG, pan_db)
    head_hits = spikes(s, db + ring_db + 1.5 * rng.standard_normal(len(s)))
    head = ring(fade(head_hits, .006) * ports(.6), HEAD, patchy_db=1.5)
    hum_hits = spikes(s, hum_db - 30 + 3.3 * rng.standard_normal(len(s)))
    hum = ring(fade(hum_hits, 0.052) * ports(0.73), HOSE)
    spring_hits = spikes(s, db + 2 * rng.standard_normal(len(s)))
    spring = ring(smooth(fade(spring_hits, 0.0066), 60) * ports(0.22), SPRING, patchy_db=5.0)
    body = nominal_scale(-18.5) * spring + nominal_scale(-28.5) * head + nominal_scale(-35.0) * hum
    return nominal_scale(0.5) * crack + place(body, RATCHET_LAG, -3.0)


def engine_bay(near):
    count = 6000
    decay = nominal_scale(-60 * np.arange(count) / SR / .09)
    bay = 1.3 * smooth(rng.standard_normal((2, count)), 4) * decay
    return nominal_scale(-40) * signal.oaconvolve(near, bay, axes=1)[:, :N]


def scene():
    near = ratchet() + knocks() + squeaks() + whistles()
    return near + engine_bay(near) + creak() + yard()


def top_cut(x):
    return signal.sosfilt(signal.butter(12, 16780, fs=SR, output="sos"), x)


def record(dry):
    rounded = np.tanh(1.19 * dry) / 1.232
    top = signal.ellip(8, .2, 70, TOP_HZ, fs=SR, output="sos")
    mix = signal.sosfilt(top, rounded)
    return top_cut(mix)


dry = scene()
out = record(dry)
to_wav(out)
```